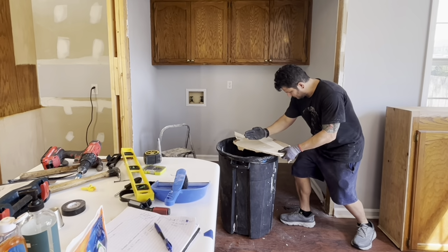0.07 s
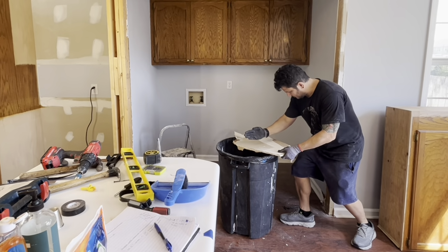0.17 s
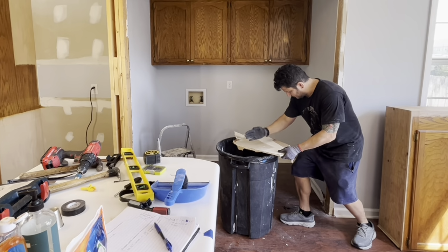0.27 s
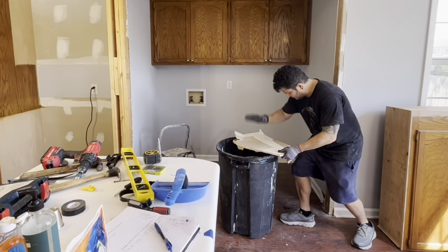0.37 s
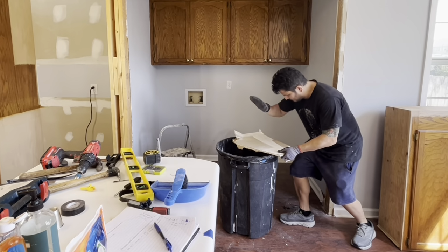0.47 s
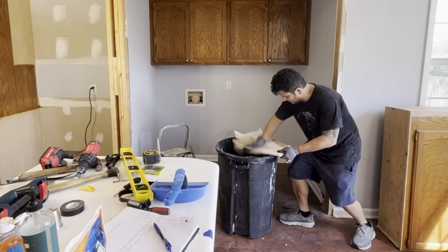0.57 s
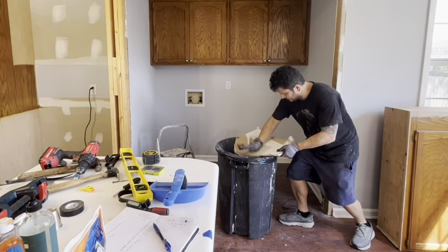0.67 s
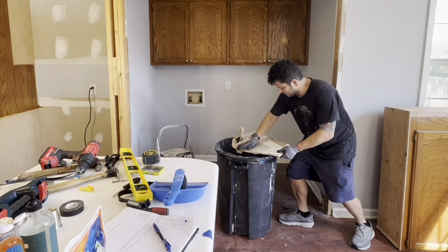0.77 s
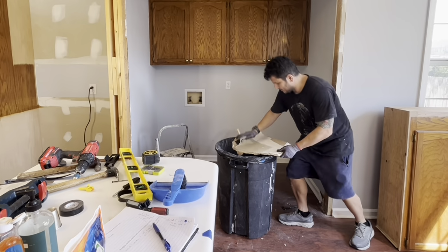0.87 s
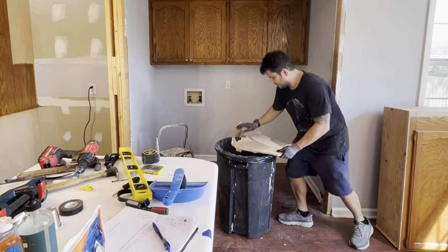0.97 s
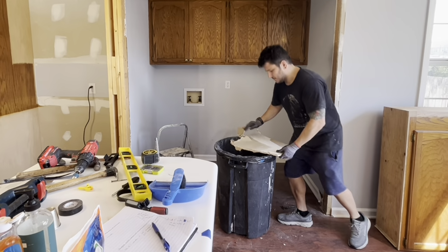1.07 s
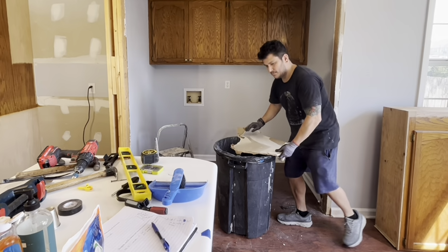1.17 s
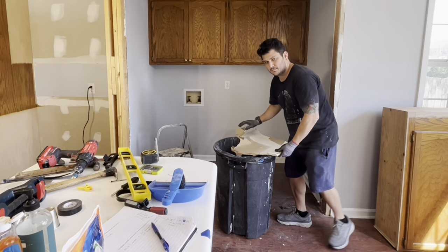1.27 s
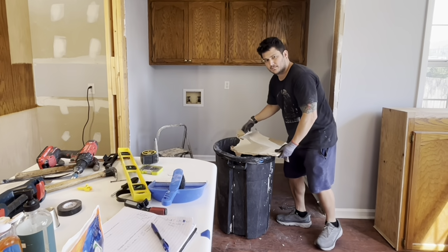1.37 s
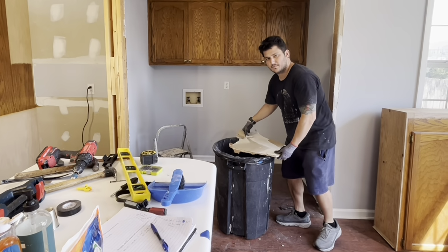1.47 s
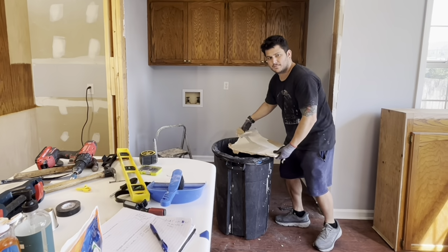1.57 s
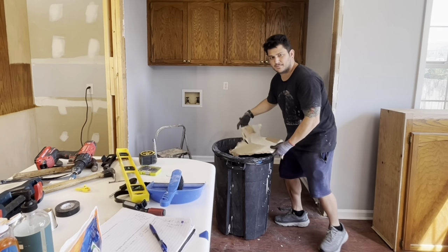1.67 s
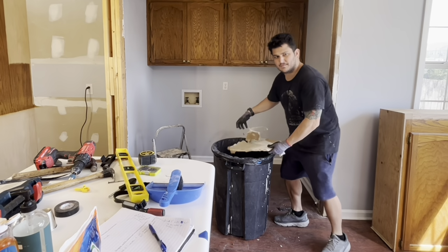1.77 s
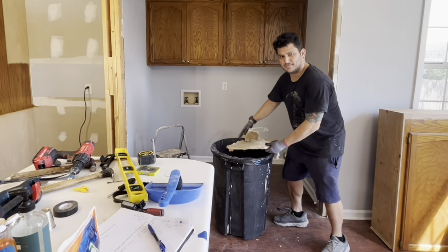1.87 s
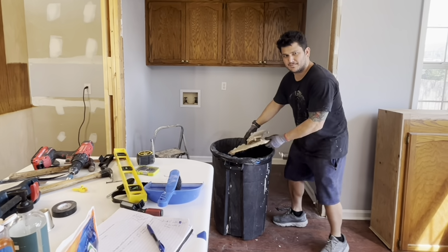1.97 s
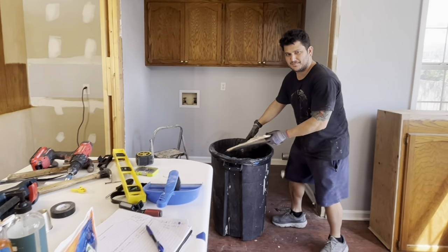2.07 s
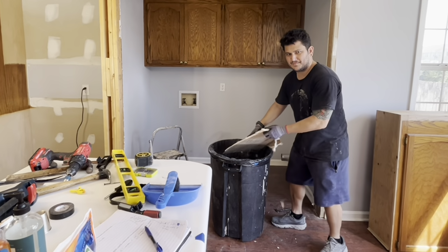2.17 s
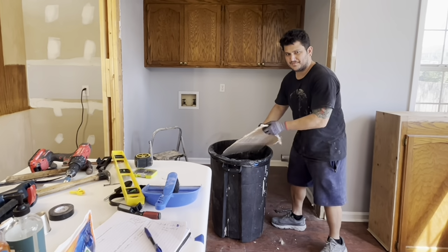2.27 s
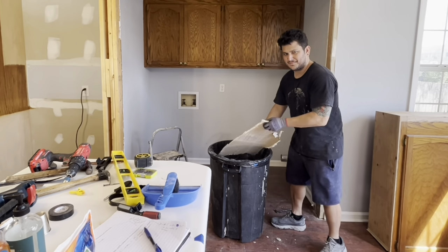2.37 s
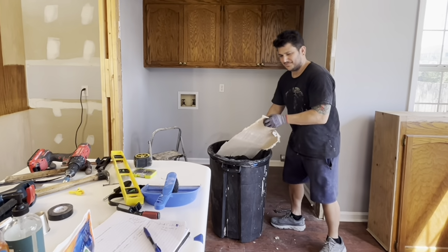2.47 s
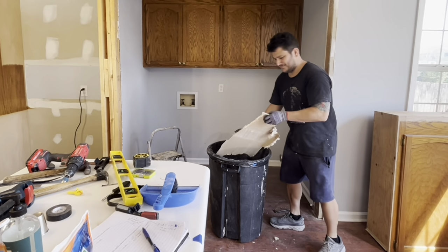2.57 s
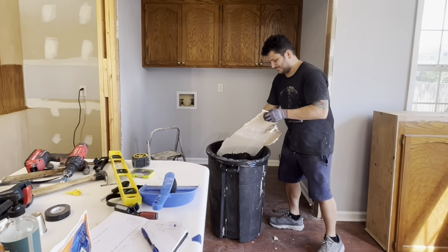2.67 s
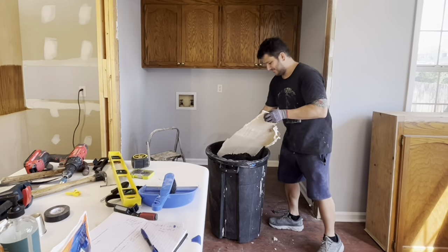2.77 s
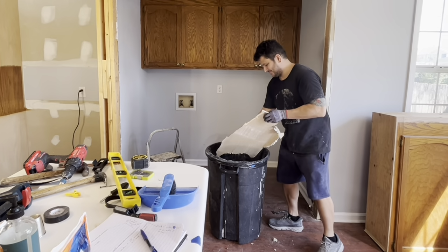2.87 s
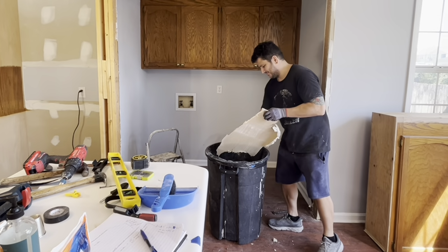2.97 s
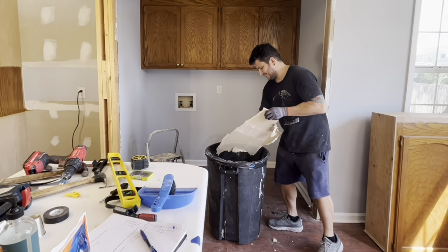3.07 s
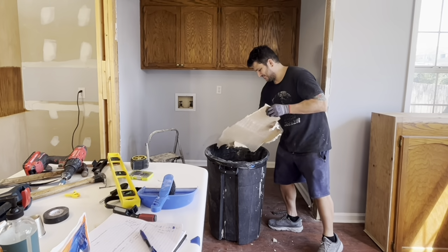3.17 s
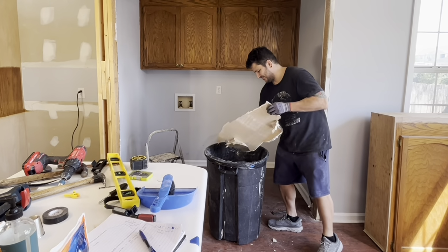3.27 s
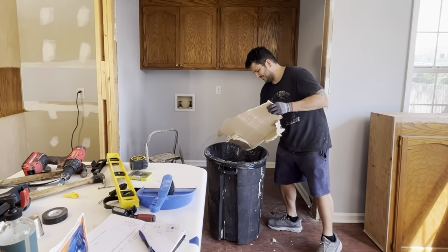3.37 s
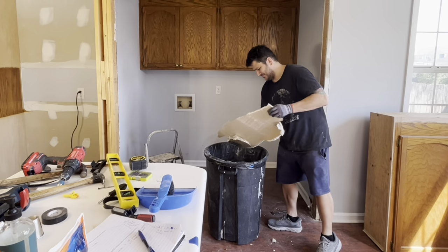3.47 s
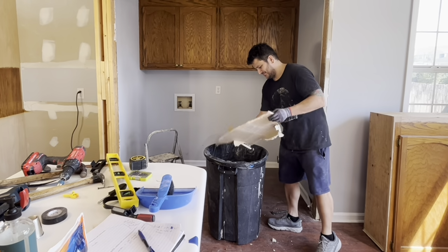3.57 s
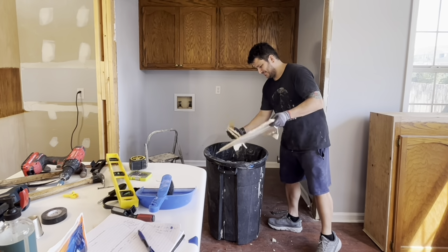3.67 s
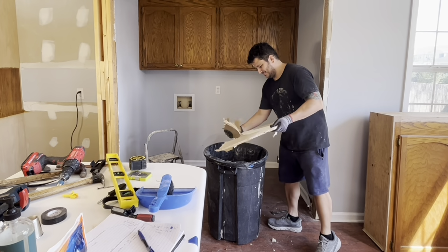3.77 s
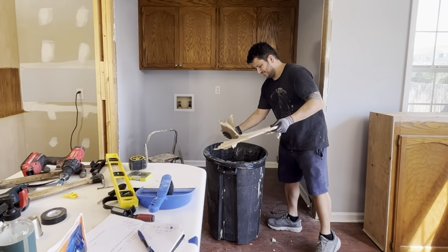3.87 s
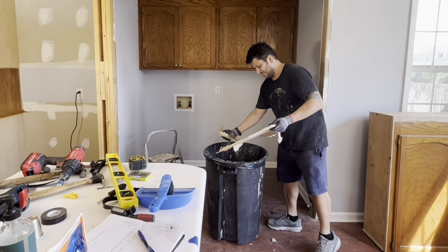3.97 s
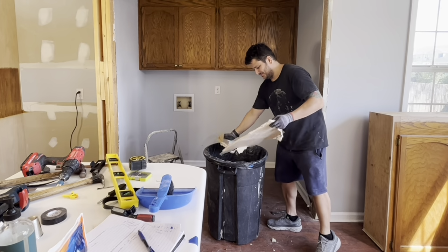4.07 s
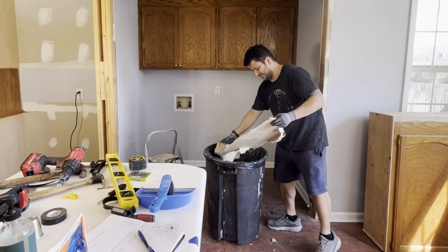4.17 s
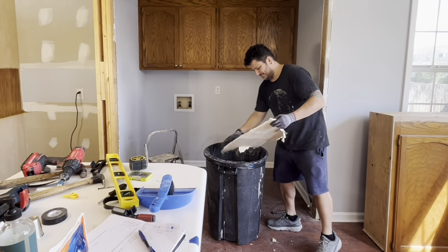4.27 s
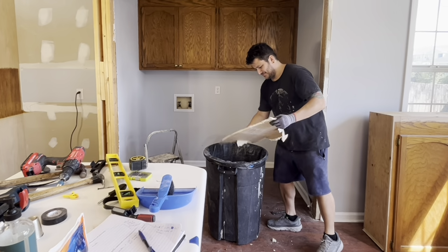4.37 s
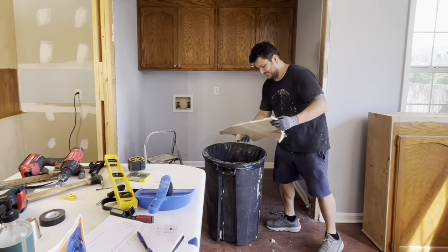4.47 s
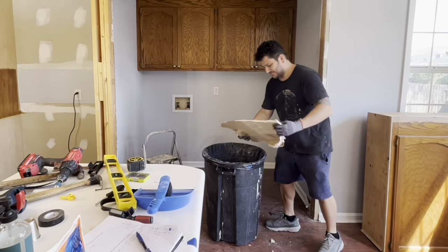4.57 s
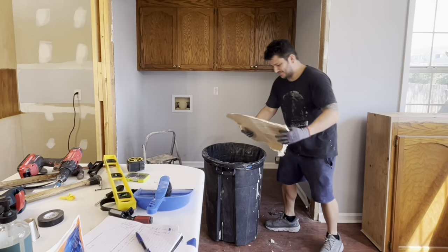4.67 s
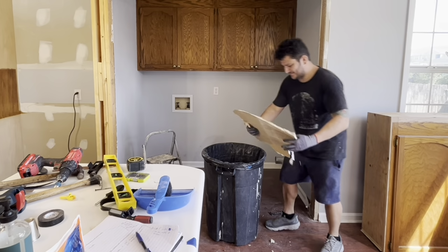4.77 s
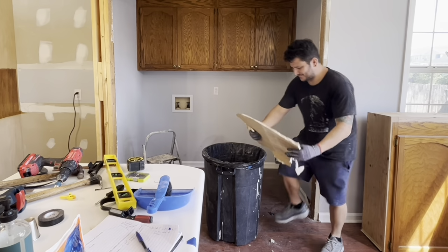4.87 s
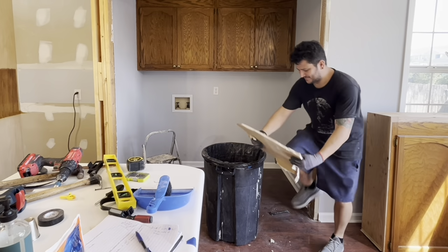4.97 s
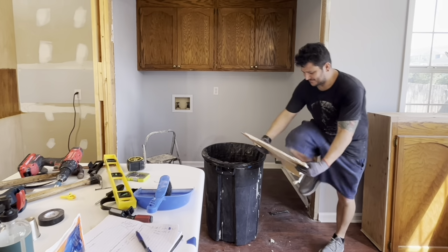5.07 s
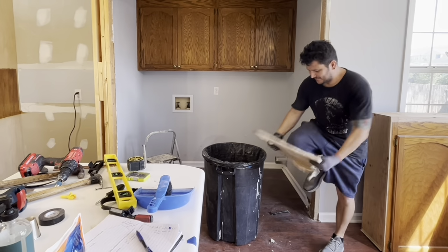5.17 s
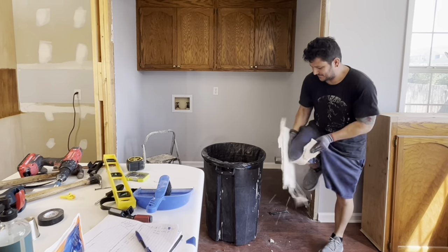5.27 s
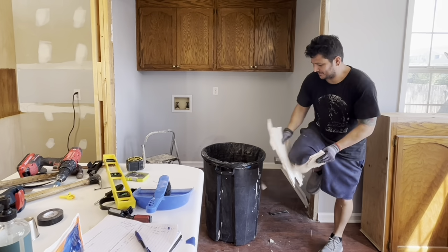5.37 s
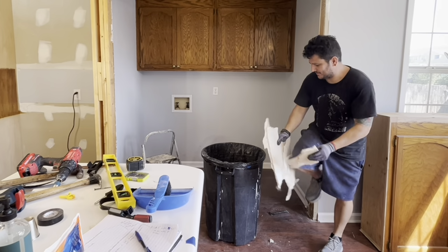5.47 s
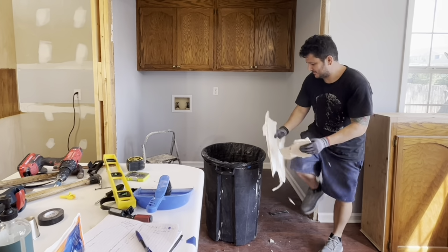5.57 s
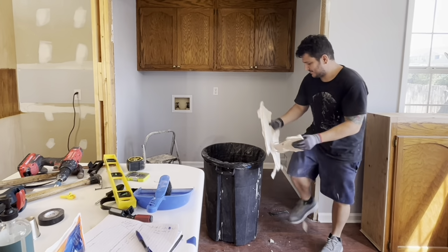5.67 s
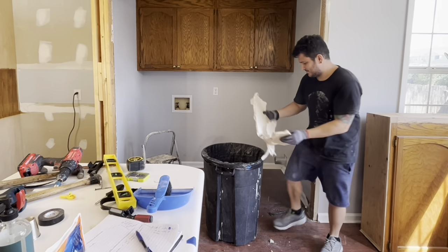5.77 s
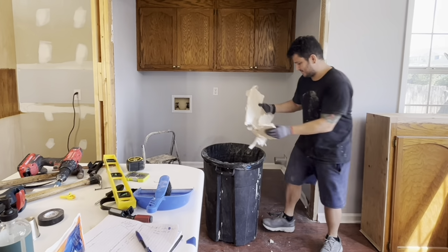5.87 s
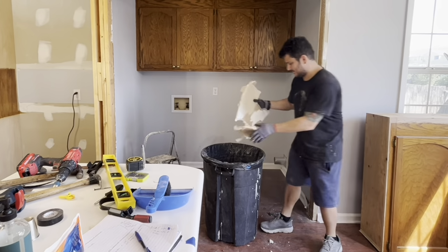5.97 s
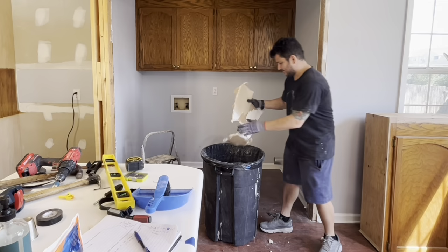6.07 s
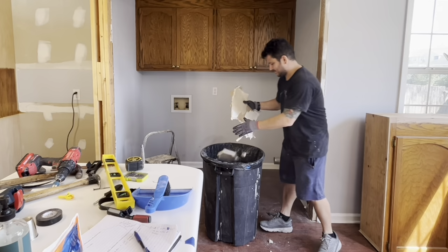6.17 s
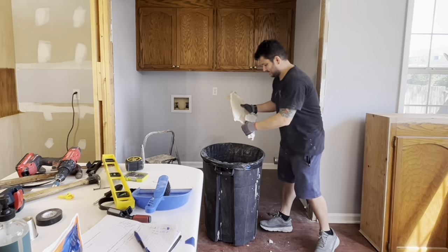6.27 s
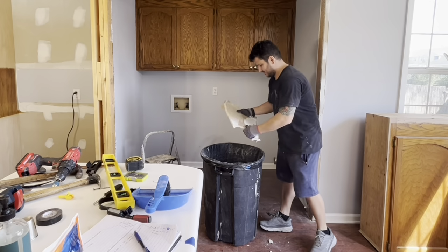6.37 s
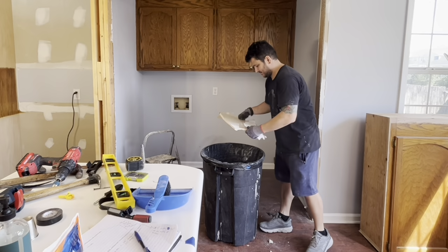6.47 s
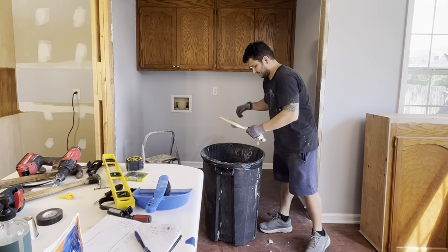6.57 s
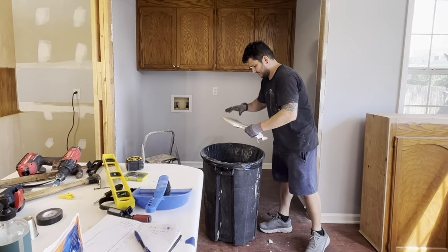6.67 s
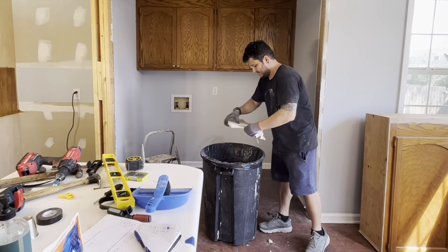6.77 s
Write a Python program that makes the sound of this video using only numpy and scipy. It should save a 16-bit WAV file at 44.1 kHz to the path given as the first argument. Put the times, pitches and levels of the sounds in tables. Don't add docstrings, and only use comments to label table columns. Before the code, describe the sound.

A bare, lively room with quiet low house noise and faint mains hum, heard by a phone microphone a few metres away. After near silence, at 0.5 s a hard punch cracks plasterboard on a plastic bin rim, with a hollow boom. Lighter taps, bumps and gritty rubs follow until 1.9 s. From 1.95 to 2.4 s the edge scrapes and chatters busily over the rim with brittle ticks. From 2.6 to 3.9 s, softer papery, sandy rubbing in several strokes. At 4.3 s a piece drops in with a crack and deep thump, rattling until 4.5 s. A near-quiet lull, then the loudest moment: a sharp, splintering snap over the knee at 5.1 s, and a second at 5.3 s, with crumbling debris. A crisp scrap cracks at 5.66 s. Soft rustling leads to bigger pieces thudding into the bin at 6.24 s, tumbling until 6.4 s; a tiny tick at 6.78 s.

```python
import sys
import numpy as np
from scipy import signal
from scipy.fft import rfft
from scipy.io import wavfile
from scipy.ndimage import uniform_filter1d

SR = 44100
rng = np.random.default_rng(int(sys.argv[2]) if len(sys.argv) > 2 else 0)


def decibels_to_gain(level_db):
    exponent = np.asarray(level_db, float) / 20
    return 10 ** exponent


def master(y):
    cut = np.clip(np.atleast_2d(y).T, -1, 1)
    pcm = np.round(cut * 32767)
    wavfile.write(sys.argv[1], SR, pcm.astype(np.int16))


N = 299868

# (time [s], crack level [dB], board ring level [dB], length [ms])
RIM_TAPS = [(0.4994, -25.5, -29, 6.9), (0.5441, -29.5, -33, 15), (0.749, -40, -36, 9),
            (0.823, -30.5, -38.5, 22.4), (0.9372, -25.5, -31, 5), (1.2314, -54, -52, 20),
            (1.349, -35, -60, 32), (1.4544, -45, -45, 16), (1.6774, -32, -38, 6.7), (1.774, -30.5, -38, 14),
            (1.959, -34, -30, 7), (2.0163, -41, -30.5, 8), (2.074, -45, -32, 11), (2.2096, -30, -46, 9.6),
            (2.2803, -29, -29.5, 11), (2.2994, -40, -30, 11), (2.3717, -37, -27, 6.7),
            (2.563, -37, -47, 25)]
# (time [s], crack level [dB], board ring level [dB], length [ms])
BREAKS = [(4.176, -40.5, -51, 40), (4.281, -25, -25.5, 15), (4.384, -30, -41, 16), (4.936, -39, -39.5, 15),
          (4.9818, -33.5, -45, 10), (5.0754, -37, -41, 57), (5.1028, -20.5, -13.5, 26),
          (5.298, -29, -14, 6.3), (5.323, -28, -29, 8.7), (6.216, -34, -38, 40), (6.228, -21.5, -24.5, 11),
          (6.239, -20, -22.5, 13), (6.2582, -21, -23.5, 25), (6.3072, -20, -27.5, 2.9),
          (6.3492, -31, -29, 13), (5.366, -43, -26.5, 4.6), (6.6707, -59, -64, 7.4)]
# (time [s], crack level [dB], board ring level [dB], length [ms], crack
# centre [Hz])
SPLINTERS = [
    (0.5016, -17, -21.5, 3.5, 3600),
    (4.988, -39, -55, 4.1, 8500),
    (2.048, -30, -34, 3.1, 5550),
    (4.3113, -26.5, -26, 32, 3450),
    (4.5095, -31, -42, 6.4, 3700),
    (4.849, -43.5, -67, 7.4, 3970),
    (5.1194, -6.5, -16.5, 6.5, 3430),
    (5.1462, -11, -23.5, 17, 3630),
    (5.2395, -16, -49, 6.9, 8850),
             (1.679, -33, -36, 2, 1500), (1.953, -40, -33.5, 3.4, 2500), (2.017, -34, -49, 2, 4000),
         (2.2, -42, -49, 2, 4500), (2.358, -34, -40, 4.2, 2000), (2.801, -31, -65, 4.5, 2500),
         (3.413, -45, -52, 4, 3400), (3.2, -42, -45, 2.8, 1900), (3.534, -39, -39.5, 3, 2810),
         (6.776, -40, -46, 2, 1500), (2.64, -30, -31, 2, 1700), (5.658, -15, -36, 1.5, 2000),
         (1.4, -36, -50, 3, 3000), (0.77, -35, -42, 3, 2500), (.938, -28.5, -30.5, 3.8, 1950),
         (1.234, -52, -44, 2, 1600), (2.28, -21.5, -34, 2.5, 2700), (2.3713, -36, -26.5, 3, 1700),
         (2.21, -24, -37, 2, 2600), (2.3, -30, -38, 2, 4000), (5.1198, -6, -27, 2, 6320),
         (5.2899, -13, -21, 1.9, 2200), (1.533, -35, -52, 12, 2500), (5.172, -16, -21, 3, 1700),
         (2.092, -32, -31.5, 3, 1600), (2.19, -28, -32, 3, 1900), (5.4306, -34, -35, 3, 1750),
         (2.402, -35, -31, 2.8, 1600)]
# (time [s], crack level [dB], board ring level [dB], length [ms])
SCRAPS = [
    (1.5352, -33, -54, 12),
    (2.6396, -36, -31, 6.3),
    (4.227, -31, -40, 30),
    (5.29, -21, -16.5, 3.3),
    (5.657, -18, -18, 15),
    (5.6792, -25, -35, 14),
    (6.776, -47, -46, 2.1),
]
# (time [s], level [dB], pace [Hz])
RIM_BUMPS = [(0.504, -4, 263), (0.534, -18, 234), (0.56, -15.5, 263), (0.615, -28, 108),
             (0.746, -22.5, 137), (0.828, -21, 230), (0.867, -22, 234), (1, -24.5, 260),
             (1.323, -26.5, 184), (1.677, -23, 331), (1.761, -19, 268), (1.925, -24.5, 205),
             (1.973, -23, 215), (2.03, -20.5, 130), (2.044, -13, 122), (2.082, -17.5, 208),
             (2.294, -22, 292), (2.319, -23, 332), (2.398, -40, 306)]
# (time [s], level [dB], pace [Hz])
KNEE_BLOWS = [
    (5.104, -2, 390),
    (5.123, -7.5, 302),
    (5.148, -9.5, 422),
    (5.296, -1.5, 284),
    (5.339, -13, 302),
    (5.366, -11.5, 327),
]
# (time [s], level [dB], pace [Hz])
TUMBLES = [(4.173, -41.5, 298), (4.289, -16, 290), (4.305, -9, 206), (4.321, -8, 215), (4.372, -10, 246),
           (4.445, -16, 211), (4.472, -18, 240), (4.505, -20, 219), (5.823, -27, 288), (5.87, -34, 215),
           (6.231, -10, 270), (6.243, -1, 241), (6.257, -3, 290), (6.283, -25, 197), (6.302, -11, 233),
           (6.349, -13.5, 324), (6.371, -13, 220), (6.427, -25, 242)]
# (time [s], level [dB], pace [Hz])
LANDINGS = [
    (0.519, -14, 105),
    (4.305, -13.5, 92.5),
    (4.45, -40, 103),
    (4.478, -36, 83),
    (5.13, -19, 98),
    (6.244, -10, 95),
    (6.289, -26, 88.8),
]
# (time [s], level [dB], pace [Hz])
KNOCKS = [(2.056, -25, 240), (2.098, -22, 380), (2.115, -23, 298), (5.108, -16, 480), (5.145, -13, 560),
          (5.306, -8.5, 269), (.71, -25.5, 240), (4.56, -27, 310), (4.443, -12, 200), (4.472, -12, 235),
          (4.311, -16, 165), (5.366, -19, 300)]
# (peak [s], rise [s], fall [s], pressure [dB], weight on the bin [dB])
RUBS = [(0.004, .01, .04, -52, 6), (.47, .06, .03, -68, 0), (.892, .2, .3, -42, 12),
        (1.556, .06, .13, -39, 6), (2.21, .03, .06, -35, 0), (2.57, .03, .2, -48, 8),
        (2.82, .1, .4, -35.5, 0), (3.056, .08, .13, -36, -2), (3.308, .15, .08, -40.5, 4),
        (3.46, .14, .3, -36, 0), (3.645, .15, .24, -30, 4), (3.767, .2, .17, -32, 2),
        (4.08, .2, .2, -52, 3), (4.39, .15, .14, -32, 15), (4.75, .15, .12, -55, 12),
        (4.862, .05, .09, -57, -3), (4.96, .04, .3, -56, 16), (5.245, .05, .12, -28, 2),
        (5.976, .25, .06, -37.5, 2), (6.21, .2, .02, -50, 3), (6.675, .012, .3, -48, 4),
        (6.79, .05, .03, -49, 6)]
# (peak [s], rise [s], fall [s], pressure [dB], weight on the bin [dB])
RATTLES = [(.535, .015, 0.31, -48, 9), (.748, 0.077, 0.16, -42, 1.5), (.952, 0.089, 0.12, -50, 4),
           (1.36, 0.084, 0.14, -44.5, -6), (1.686, 0.041, 0.55, -41.5, -2.5),
           (2.306, 0.063, 0.13, -40.5, -1), (2.41, 0.11, 0.19, -46, -8), (2.655, 0.02, 0.1, -45, -8),
           (4.3, 0.019, 0.17, -32, -1.5), (4.5, 0.085, 0.018, -44.5, 7), (5.08, .1, 0.088, -43, -10),
           (5.135, 0.015, 0.14, -18, -14), (5.31, .015, 0.095, -39.5, 12), (5.68, 0.016, 0.048, -32.5, -25),
           (5.82, 0.025, 0.18, -62, 5)]
# (peak [s], rise [s], fall [s], pressure [dB], weight on the bin [dB])
DRAGS = [
    (1.97, .1, 0.09, -47, 8.5),
    (2.07, .1, 0.11, -35, -4),
    (2.19, .25, 0.055, -31.5, -24),
]
# (peak [s], rise [s], fall [s], level [dB], patch pitch [Hz])
SLIDES = [(2.001, 0.043, 0.067, -36.5, 1040), (2.06, 0.063, 0.096, -30.5, 457),
          (2.099, 0.082, 0.12, -31.5, 1370), (2.19, .06, 0.14, -34.5, 1124),
          (2.119, 0.065, 0.096, -42, 4450), (2.18, 0.089, 0.095, -44.5, 5370), (2.33, .04, 0.043, -35, 915),
          (2.41, 0.041, 0.04, -37.5, 844), (2.47, .03, 0.035, -43, 957), (2.58, 0.021, 0.051, -41, 2300),
          (2.645, .03, 0.12, -40, 690), (2.74, 0.051, 0.033, -46, 890), (2.81, 0.019, 0.056, -55, 2500),
          (2.93, .12, 0.3, -50.5, 1000), (3.055, 0.027, 0.039, -42, 2570), (3.06, 0.042, .08, -42, 4240),
          (3.43, 0.021, 0.07, -46, 918), (3.49, 0.057, 0.069, -42, 2900), (3.54, 0.023, .05, -39.5, 2800),
          (3.629, 0.053, 0.11, -36, 4530), (3.66, 0.072, 0.052, -40.5, 1000), (3.76, .05, 0.093, -50, 1770),
          (3.86, 0.031, 0.05, -48, 1860), (.95, 0.014, 0.086, -38.5, 2100),
          (1.233, 0.0075, 0.034, -58, 843), (1.55, 0.018, 0.066, -38, 3000),
          (1.79, 0.031, 0.038, -38, 1000), (4.96, .03, .12, -54, 560), (5.67, 0.011, 0.084, -32, 1050),
          (4.7, 0.13, 0.12, -66, 763),
          (2.11, .02, 0.03, -35, 2400), (5.13, .02, 0.11, -33, 520), (5.17, .04, 0.24, -36.5, 3130),
          (6.28, 0.028, .08, -31, 483), (1.7, 0.022, .15, -49.5, 660), (4.35, 0.046, 0.27, -42, 590),
          (3.13, 0.059, .1, -55, 397), (.3, .2, 0.22, -68, 280), (0.27, 0.17, 0.089, -56, 121),
          (2.65, .015, .06, -40, 1680), (6.78, .006, .03, -47, 1300), (1.22, 0.09, 0.13, -64, 5600),
          (4.14, 0.088, 0.15, -59, 5000), (6.6, .12, .1, -66, 4700), (4.85, .12, 0.095, -57, 1620),
          (5.42, 0.1, 0.18, -37, 283), (4.2, 0.029, 0.12, -47.5, 325), (2.09, .04, 0.057, -31, 296),
          (5.3, 0.011, 0.09, -33, 2300), (6.29, .05, .1, -43, 3200), (6.27, .035, .14, -33, 1150),
          (4.39, .02, .07, -38, 3600), (.02, .018, .12, -60, 190), (3.57, .06, .1, -48, 310)]

# (grit [dB], paper fizz [dB], board [dB], bin [dB])
RUB_MIX = (0, -6, -4.5, -12)
RATTLE_MIX = (1, -9.5, 3, 12.5)
DRAG_MIX = (1, -9.5, 4, 10)
WEIGHT_SHARE = 0.033, -0.05, 0.25, 1

# (frequency [Hz], level [dB], t60 [s])
BOARD = [(752, 2, 0.02), (803, -4, 0.057), (888, 5, 0.02), (1037, 7.5, 0.01), (1141.5, -1, 0.05),
         (1232, -4.5, 0.025), (1370, 0, 0.02), (1499, -6.5, 0.047), (1640, 1.5, 0.018), (1915, -4.5, 0.04),
         (2020, 4, 0.0078), (2396, -2.5, 0.012), (2636, -0.5, 0.015)]
# (frequency [Hz], level [dB], t60 [s])
BIN = [(70.7, -8.5, 0.089), (87, 3.5, 0.036), (117, -17, 0.19), (156, -19, 0.022), (190, 4, 0.043),
       (215, -6.5, 0.13), (234, -4.5, 0.07), (244, -24.5, 0.07), (287.8, 6, 0.038), (323.2, -10, 0.17),
       (357.1, -8, 0.13), (390, 1.5, 0.04), (456, -4.5, 0.084), (491, -1, 0.03)]
# (frequency [Hz], level [dB per Hz])
CRACK = [(1060, -47.5), (1800, -8), (2800, -7), (3600, -5.5), (4550, -5.5), (4940, -7.5), (7890, -12),
         (9280, -12.5), (14200, -33), (15500, -45)]
# (frequency [Hz], level [dB per Hz])
GRIT = [(1060, -10), (1800, 1), (2420, -0.5), (2630, -3.5), (3250, -1.5), (4810, -5), (5420, -10),
        (7000, -16), (9100, -38), (15400, -120)]
# (frequency [Hz], level [dB per Hz])
FIZZ = [(3530, -54), (6000, -4.5), (7830, -4), (9180, -4), (13000, -17), (14500, -29), (15300, -13),
        (15500, -17)]
# (frequency [Hz], level [dB per Hz])
RIM_GRIT = [(1060, -30), (1800, -2.5), (2020, -6.5), (3330, -22), (4320, -11), (5770, -17.5), (6320, -40),
            (7000, -36), (9100, -59), (15400, -120)]
# (frequency [Hz], level [dB per Hz])
RIM_FIZZ = [(3530, -43), (6000, -9), (6580, 3.5), (9620, 5), (11600, -16), (12900, -52), (13500, -62)]
# (frequency [Hz], t60 [s], level [dB])
ROOM = [(59, 0.64, -10), (119, 0.4, -0.5), (250, 0.64, -2), (477, 0.71, -0.5), (1000, 0.79, 2),
        (2500, 0.92, 0), (6060, 0.7, 2.5), (12100, 0.59, 2)]
# (frequency [Hz], level [dB per Hz])
AIR = [(30, 6), (60, 3), (100, -5), (180, -14), (300, -21), (600, -31), (1300, -28), (3000, -41),
       (6000, -45), (10000, -45), (14000, -54)]
# (frequency [Hz], level [dB])
MIC = [(20, -48), (50, -1), (62, 5), (120, 0.5), (152, -5.5), (200, -0.5), (7600, -3), (7950, -6.5),
       (8300, -1), (14400, 9.5), (15300, -23)]

CRACK_HZ, RING_HZ, SCRAP_RING_HZ = 2500, 860, 1600
BUMP_TURNS, KNEE_TURNS, TUMBLE_TURNS, LANDING_TURNS, KNOCK_TURNS = 2.53, 2.58, 1.72, 1.93, 2.8
STROKE_DB, SWELL_DB = -5.5, -20
PATCH_SPREAD, PATCH_CYCLES = 0.157, 18
CHATTER_PER_S, CHATTER_DB = 2400, 4
ROOM_DB, AIR_DB = -2, -57
HUM_HZ, HUM_DB = 61.4, -73


def evened(x):
    return x / np.sqrt(np.mean(x ** 2) + 1e-20)


def peaked(x, ms=5):
    return x / np.sqrt(uniform_filter1d(x ** 2, int(ms * SR / 1000)).max() + 1e-20)


def read(points, hz):
    f, value = np.transpose(points)
    return np.interp(np.log(hz + 1), np.log(f + 1), value)


def near(hz, centre_hz, fall_db):
    return -fall_db * np.log2(np.asarray(hz) / centre_hz) ** 2


def add(mix, s, sound):
    part = mix[round(s * SR):][:len(sound)]
    part += sound[:len(part)]


def colour(points, size=1024):
    hz = abs(np.fft.fftfreq(4 * size, 1 / SR))
    log_gain = np.log(decibels_to_gain(np.maximum(read(points, hz), -80)))
    minimum_phase = np.exp(np.conj(signal.hilbert(log_gain)))
    taps = np.fft.ifft(minimum_phase).real[:size]
    return taps / np.linalg.norm(taps)


def ring(modes, tilt_db=0, detune=1, size=12000):
    hz, db, t60 = np.transpose(modes)[:, :, None]
    t = np.arange(size) / SR
    sign = (-1) ** np.arange(len(hz))[:, None]
    swell_in = 1 - np.exp(-t * hz / 0.43)
    decay = decibels_to_gain(db + tilt_db - 60 * t / t60)
    answer = (sign * swell_in * decay * np.sin(2 * np.pi * hz * detune * t)).sum(0)
    return answer / np.linalg.norm(answer)


def grains(count, per_s, spread_db):
    size = decibels_to_gain(spread_db * np.minimum(rng.exponential(1, count), 5))
    happens = rng.random(count) < per_s / SR
    return evened(size * rng.standard_normal(count) * happens)


def snap(s, crack_db, crack_hz, board_db, board_hz, ms):
    t = np.arange(4000) / SR
    length = max(ms, 1) / 1000
    rise = length * np.clip(0.16 * decibels_to_gain(-0.6 * (board_db + 52)), 0.04, 0.5)
    burst = grains(len(t), 12000, 0.34) * np.exp(-t / length) * np.minimum(t / rise, 1)
    hardness = np.clip(decibels_to_gain(0.5 * (board_db + 27)), 0, 1)
    burst[:8] += hardness * 1.65 * np.hanning(8)

    hz, db = np.transpose(CRACK)
    reach_db = 0.9 * crack_db + 5.5
    lift_db = np.maximum(near(hz, crack_hz, 24), reach_db)
    crack = signal.oaconvolve(burst, colour(np.transpose([hz, db + lift_db]), size=256))

    tilt_db = near(np.array(BOARD)[:, :1], board_hz, 5)
    detune = rng.uniform(0.899, 1.032)
    board = signal.oaconvolve(burst, ring(BOARD, tilt_db, detune, size=2500))
    out = decibels_to_gain(board_db - 2) * peaked(board)
    add(out, 0, decibels_to_gain(crack_db - 9) * peaked(crack))
    return s, out


def thud(s, db, hz, turns):
    t = np.arange(int(max(turns, 0.5) * SR / hz)) / SR
    push = signal.windows.hann(len(t)) * np.sin(2 * np.pi * hz * t)
    strike_spot_db = 2.5 * rng.standard_normal((len(BIN), 1))
    tilt_db = near(np.array(BIN)[:, :1], hz, 7) + strike_spot_db
    boom = signal.oaconvolve(push, ring(BIN, tilt_db, size=9000))
    add(boom, 0, 1.53 * np.abs(boom).max() * push)
    return s, decibels_to_gain(db - 8) * peaked(boom, 15.7)


def swell(s, rise, fall, db, weight_db, mix_db):
    layers_db = db + np.array(mix_db) + weight_db * np.array(WEIGHT_SHARE)
    start, end = max(s - max(rise, 0.01), 0), s + max(fall, 0.015)
    faint_db = layers_db + SWELL_DB
    return [(start, *faint_db), (s, *layers_db), (end, *faint_db)]


def stroke(rows, grit, fizz):
    s, *levels_db = np.transpose(rows)
    t = np.arange(s[0], s[-1], 1 / SR)
    textures = (11600, 2.3), (15800, 0.59), (2450, 3.2), (1493, 3.25)
    drives = [grains(SR, per_s, db)[:len(t)] for per_s, db in textures]
    wander = evened(uniform_filter1d(rng.standard_normal(SR), 500))
    judder = decibels_to_gain(1.36 * wander)[:len(t)]
    fade = signal.windows.tukey(len(t), 900 / len(t))
    bin_tilt_db = near(np.array(BIN)[:, :1], 207, 1.6)
    bodies = colour(grit), colour(fizz), ring(BOARD, size=4000), ring(BIN, bin_tilt_db)
    out = np.zeros(len(t) + 12000)
    for drive, db, body in zip(drives, levels_db, bodies):
        pressed = drive * judder * decibels_to_gain(np.interp(t, s, db) + STROKE_DB) * fade
        add(out, 0, signal.oaconvolve(pressed, body))
    return s[0], out


def patchy(x, depth_db=2.2):
    z = signal.stft(x, nperseg=512)[2]
    flicker = rng.standard_normal(z.shape[::-1]).T
    patches = uniform_filter1d(uniform_filter1d(flicker, 8, 0), 9, 1)
    return signal.istft(z * decibels_to_gain(depth_db * evened(patches)), nperseg=512)[1][:len(x)]


def slide(s, rise, fall, db, hz):
    rise, fall = max(rise, 0.005), max(fall, 0.015)
    t = np.arange(-rise, fall, 1 / SR)
    spacing = PATCH_SPREAD * np.linspace(-1.5, 1.5, num=7)
    pitch = hz * np.exp(spacing + 0.036 * rng.standard_normal(7))
    modes = np.transpose([pitch, near(pitch, hz, 47), PATCH_CYCLES / pitch])
    hiss, wander = rng.standard_normal((2, SR // 2))[:, :len(t)]
    grip = uniform_filter1d(wander, 30) * np.sqrt(SR / CHATTER_PER_S)
    chatter = evened(hiss * decibels_to_gain(CHATTER_DB * grip))
    level = decibels_to_gain(db + np.interp(t, [-rise, 0, fall], [SWELL_DB, 0, SWELL_DB]))
    return s - rise, signal.oaconvolve(chatter * level, ring(modes, size=3000))


def walls():
    tails = []
    for _ in range(3):
        taps = np.zeros(SR)
        at = np.arange(160, SR - 20, 20)
        taps[at + rng.integers(0, 20, len(at))] = rng.choice([-1., 1.], len(at))
        hz, t, z = signal.stft(taps, SR, nperseg=512)
        t60, db = (read(np.array(ROOM)[:, [0, c]], hz)[:, None] for c in (1, 2))
        early = 0.51 * decibels_to_gain(-60 * t / 0.15)
        late = decibels_to_gain(db - 60 * t / np.maximum(t60, 0.1))
        tail = signal.istft(z * (late + early), SR, nperseg=512)[1]
        tail[:160] = 0
        tails.append(tail / np.linalg.norm(tail))
    return tails


def room(x, tails):
    turn = np.arange(N) / SR * 2.3
    echo = np.zeros(N)
    for k, tail in enumerate(tails):
        share = np.sqrt(2 / 3) * np.cos(np.pi * (turn + k / 3))
        echo += signal.oaconvolve(x * share, tail)[:N]
    return echo


def air():
    wash = evened(signal.oaconvolve(rng.standard_normal(N), colour(AIR, size=8192))[:N])
    waver = 1 + 0.47 * evened(uniform_filter1d(rng.standard_normal(N), 3000))
    hum = waver * np.sin(2 * np.pi * HUM_HZ * np.arange(N) / SR)
    return decibels_to_gain(AIR_DB) * wash + decibels_to_gain(HUM_DB) * hum


def scene():
    work, rubbing = np.zeros(N), np.zeros(N)
    plain_snaps = [(*row, CRACK_HZ) for row in RIM_TAPS + BREAKS]
    for s, crack_db, board_db, ms, hz in plain_snaps + SPLINTERS:
        add(work, *snap(s, crack_db, hz, board_db, RING_HZ, ms))
    for s, crack_db, board_db, ms in SCRAPS:
        add(work, *snap(s, crack_db, CRACK_HZ, board_db, SCRAP_RING_HZ, ms))

    for rows, turns in ((RIM_BUMPS, BUMP_TURNS), (KNEE_BLOWS, KNEE_TURNS), (TUMBLES, TUMBLE_TURNS),
                        (LANDINGS, LANDING_TURNS), (KNOCKS, KNOCK_TURNS)):
        for row in rows:
            add(work, *thud(*row, turns))

    for rows, mix_db, grit, fizz in ((RUBS, RUB_MIX, GRIT, FIZZ), (RATTLES, RATTLE_MIX, GRIT, FIZZ),
                                     (DRAGS, DRAG_MIX, RIM_GRIT, RIM_FIZZ)):
        for row in rows:
            add(rubbing, *stroke(swell(*row, mix_db), grit, fizz))
    work += patchy(rubbing)

    for row in SLIDES:
        add(work, *slide(*row))
    return (work + decibels_to_gain(ROOM_DB) * room(work, walls()) + air())[None]


def band_limit(x):
    return signal.sosfilt(signal.butter(12, 15140, fs=SR, output="sos"), x)


def record(dry):
    taps = colour(MIC, size=4096)
    unit_gain = abs(rfft(taps)[93])
    heard = signal.oaconvolve(dry, taps[None] / unit_gain)[:, :N]
    limited = 1.5 * np.tanh(heard / 1.5)
    return band_limit(limited)


dry = scene()
out = record(dry)
master(out)
```